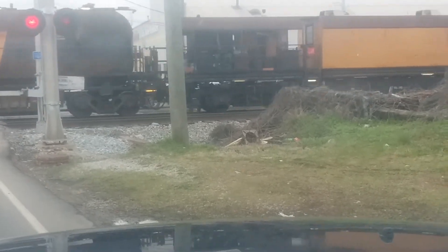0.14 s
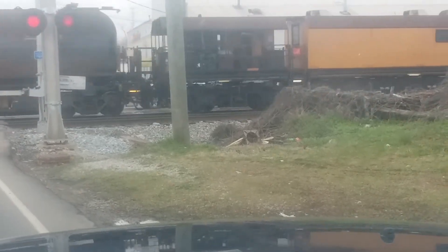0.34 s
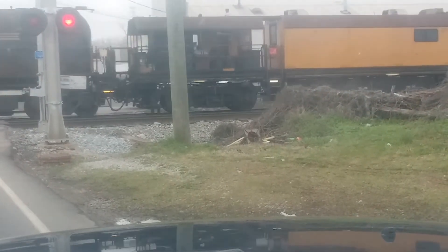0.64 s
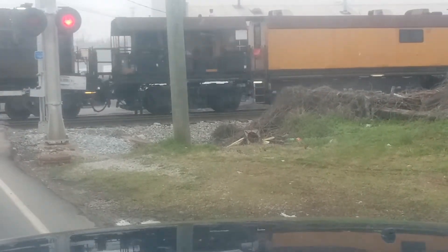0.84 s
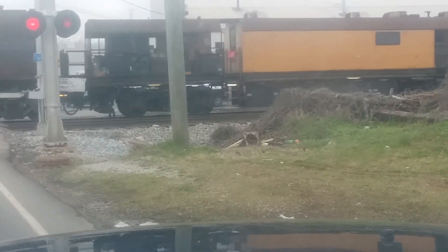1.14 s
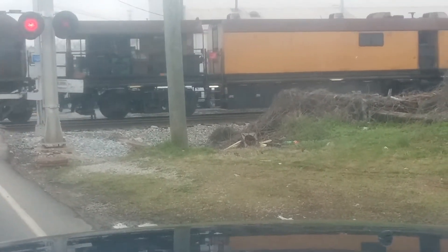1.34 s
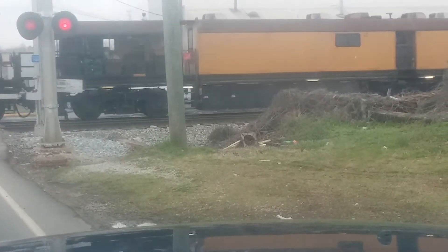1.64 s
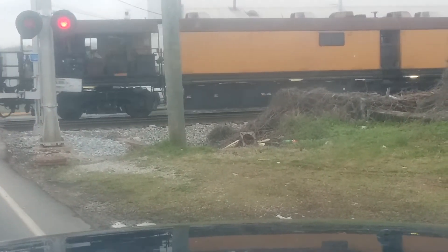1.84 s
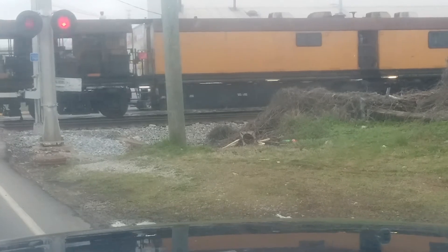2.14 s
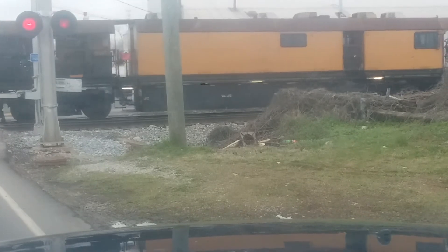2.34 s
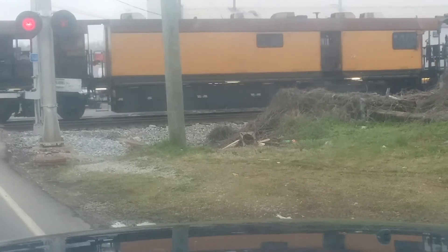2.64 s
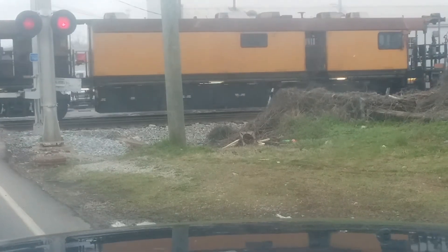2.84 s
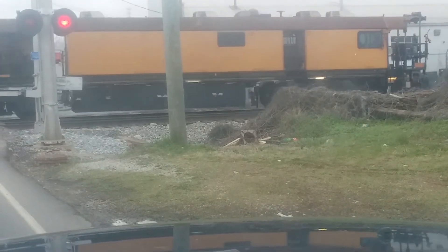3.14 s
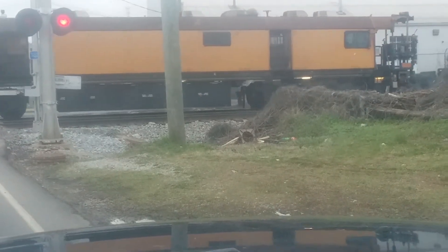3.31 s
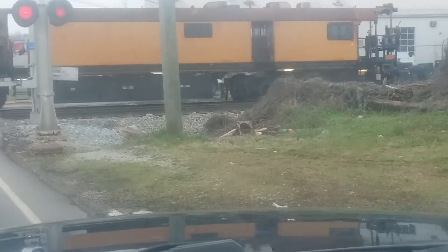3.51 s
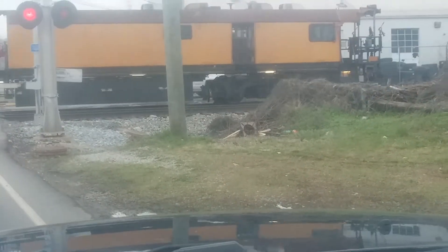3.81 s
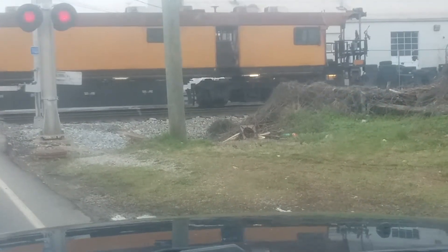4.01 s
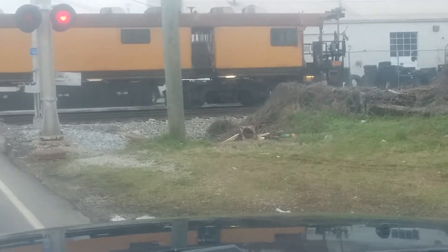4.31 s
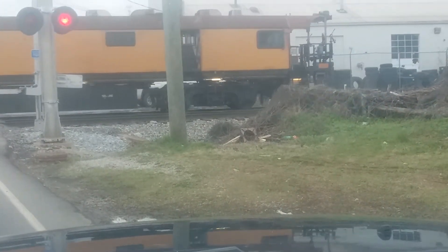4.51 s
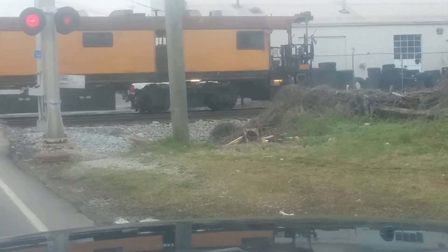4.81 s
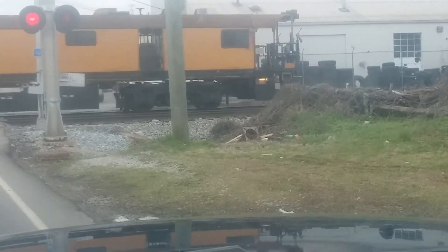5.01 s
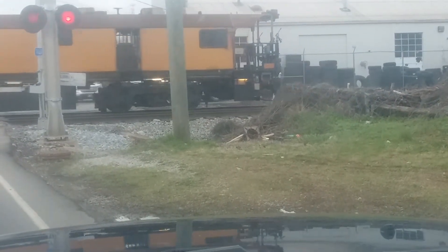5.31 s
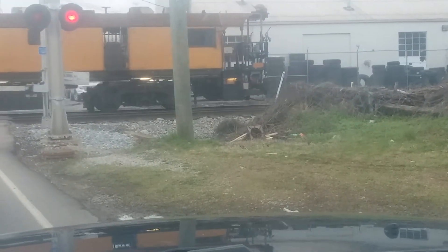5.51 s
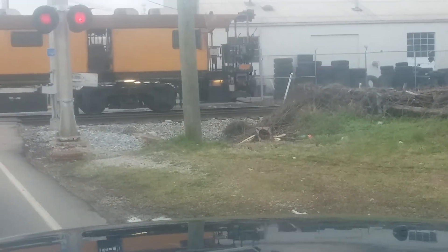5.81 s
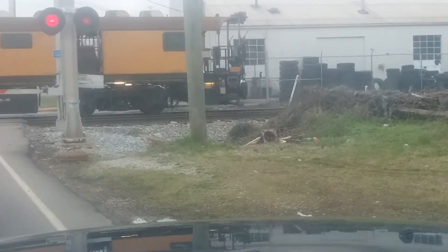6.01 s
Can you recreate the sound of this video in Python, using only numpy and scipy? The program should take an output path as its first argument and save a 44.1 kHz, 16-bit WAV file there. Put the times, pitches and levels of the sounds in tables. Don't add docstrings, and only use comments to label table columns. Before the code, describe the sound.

Heard on a handheld phone inside a closed, idling car at a grade crossing. From 0 s a slow train passes close by: deep, boomy rumble through the body panels, a steady low generator hum and an uneven diesel throb. Heavy axles push the cabin air in soft thumps near 0.2, 1.2, 2.1, 4 and 6.1 s. Faint wheel singing swells around 1.5, 2.7 and 4.1 to 4.5 s. A muffled gong outside strikes evenly, about five times in two seconds. The car engine purrs low and a vent fan hisses smoothly. The train gradually weakens over six seconds. Skin rubs the phone from 3.5 to 4 s with tiny creaks, a low knock comes at 4.6 s, a small squeak at 5.2 s, and crisp creaks cluster from 5.3 to 6 s. A thin, very high electronic whine jumps and glides throughout.

```python
import sys
import numpy as np
from scipy import signal
from scipy.fft import rfft, irfft, next_fast_len
from scipy.io import wavfile
from scipy.ndimage import uniform_filter1d

SR = 44100
rng = np.random.default_rng(int(sys.argv[2]) if len(sys.argv) > 2 else 0)


def put_to_file(sound):
    columns = np.atleast_2d(sound).T
    safe = np.clip(columns, -1, 1)
    whole_steps = np.round(safe * 32767)
    wavfile.write(sys.argv[1], SR, whole_steps.astype(np.int16))


def to_linear_factor(level_db):
    exponent = np.asarray(level_db, float) / 20
    return 10 ** exponent


N = 271207

# f/Hz, level/dB per Hz
RUMBLE_SPECTRUM = [(27, -41), (38, -17.5), (80, -18.5), (150, -11), (210, -18.5), (260, -19.5), (310, -23),
                   (360, -24.5), (480, -25.5), (570, -28), (760, -34), (1200, -40.5), (1600, -54.5),
                   (3000, -81.5)]
# f/Hz, width/Hz, lift/dB
PANEL_MODES = [(192.6, 6.9, 5.5), (233.3, 6.3, 6.5), (284.8, 12, 7.5), (322, 5.9, 3.5), (355, 8.2, 3.5),
               (407, 50, 3.5), (439.4, 7.9, 8.5), (460.4, 5.2, 7.5), (488.4, 4.5, 6), (529, 5.2, 2.5),
               (615, 44, 2.5), (726, 5.5, 8.5), (890, 5.9, 5.5)]
# f/Hz, width/Hz, level/dB
CABIN_AIR_MODES = [(117.8, 9, 7.5), (97.7, 14, -5.5), (148.8, 10, -11.5)]
# t/s, lift/dB, half length/s
AXLE_JOLTS = [(.2, 6.5, 0.77), (.75, 4, 0.24), (1.15, 9, .12), (2.14, 11.5, 0.17), (2.38, 4, .15),
              (2.78, 5, 0.12), (3.15, 4.5, 0.69), (3.92, 10, 0.1), (4.1, 10, .14), (5.12, 4.5, 0.25),
              (6.15, 13.5, .14)]
# t/s, level/dB
HUM_LEVEL = [(0, -30), (.2, -30), (.5, -32), (.7, -29.5), (1.0, -33), (1.4, -28.5), (1.9, -33.5),
             (2.3, -32), (2.7, -32), (3.0, -32), (3.4, -34.5), (3.8, -32.5), (4.2, -34), (4.6, -35.5),
             (5.0, -35), (5.4, -37.5), (5.7, -34), (6.15, -39)]
# multiple of the turning rate, level/dB
DIESEL_ORDERS = [(1, -59.5), (1.4, -61), (1.5, -53), (2, -55.5), (4, -46)]
WHEEL_PITCHES = [
    [388, 420],
    [531],
    [711],
]
# (t/s, lift/dB, half length/s)
WHEEL_SONG = [
    (9, -50.5, .4, [(1.5, 3.5, 1.3), (1.9, 2.5, .2), (2.7, 7.5, 0.38), (4.1, 6, .5), (4.55, 5, 0.27)]),
    (3, -58.5, .4, [(0, 9, 1.4), (2.1, 3, .4), (3.0, 4, .5), (4.7, 3, 0.84)]),
    (6, -63, .1, [(0, 6, 0.33), (1.69, 4, .25), (2.9, 5, .2), (4.1, 4.5, .5), (4.55, 6, .2), (5.3, 4, .8)]),
]
GONG_PITCHES = [581, 1047, 1205, 1554.8, 2099.5, 2685.3]
# level/dB, time to fall 60 dB/s, left-right/dB, left lead/rad
GONG_MODES = [(-63.5, 1.9, 3, 1.5), (-61, 0.84, 1, 1.5), (-63, 1.5, 0.5, 0.8), (-55, 1, -2, 4),
              (-66.5, 1.7, -2.5, 0.7), (-67, 1.7, 6.5, 0)]
# multiple of the turning rate, level/dB
CAR_ENGINE_ORDERS = [(1, -46), (2, -50), (3, -58.5), (4, -46), (6, -47.5), (6.5, -51.5), (7, -59.5)]
# f/Hz, level/dB per Hz
VENT_SPECTRUM = [(500, -30), (900, -1.5), (1500, -2.5), (2000, -3), (2500, -0.5), (2850, -2.5),
                 (3300, -9.5), (4300, -17.5), (5500, -24.5), (7300, -25), (8200, -33), (11000, -33),
                 (16000, -32.5)]
# t/s, lift/dB, half length/s
FAN_BREATHS = [
    (.75, 1.1, 0.34),
    (2.07, 0.4, 0.36),
    (3.2, .9, 0.37),
    (5.3, 0.9, 0.42),
]
# t/s, peak/dB, f/Hz, left-right/dB
CASE_CREAKS = [(3.79, -63, 7000, -2), (3.8, -62, 4600, 5), (3.958, -60, 6750, 0), (3.96, -56, 12300, -6),
               (3.985, -59, 6940, 0), (3.994, -64, 6800, 4), (4.463, -60, 5600, 8), (4.624, -61, 5800, 2.5),
               (4.669, -66, 6500, 4), (4.695, -63, 5000, 4), (4.85, -63, 5500, 6), (4.96, -62, 5470, 4),
               (5.0, -66, 6800, 4), (5.345, -56, 5600, -1.5), (5.469, -58, 5500, 3), (5.476, -61, 5800, 5),
               (5.47, -72, 8500, -2.5), (5.54, -63, 6200, 3), (5.601, -59, 4300, 9), (5.735, -69, 8300, -9),
               (5.817, -53, 7500, 0), (5.819, -56, 5000, 6), (5.895, -51, 4660, 8),
               (5.896, -62, 6500, -2.5), (5.911, -55, 4700, 1.5), (5.949, -60, 4500, 4),
               (5.992, -64, 9500, -5), (6.008, -62, 4700, 7), (6.038, -71, 8500, -7)]
# t/s, peak/dB, f/Hz, left-right/dB, width/Hz
CASE_SQUEAKS = [
    (4.597, -39, 728, 0, 50),
    (5.212, -58, 4500, -3, 180),
    (5.215, -61.5, 6070, 5, 90),
]
# f/Hz, level/dB per Hz
RUB_SPECTRUM = [(2500, -33.5), (4500, -3.5), (6500, 4.5), (8500, 1), (9800, -8), (11500, 1), (13000, -0.5),
                (16000, -10)]
# t/s, lift/dB, half length/s
SKIN_SLIDES = [(3.5, 7, .08), (3.64, 13, .12), (3.79, 15, .09), (3.88, 11, .08), (3.96, 18.5, 0.098),
               (4.9, 9, 1.1), (5.5, 8, .25), (5.75, 12, .07), (5.83, 15, 0.1), (5.92, 14, 0.1),
               (6.03, 17, 0.11)]
# t/s, f/Hz, glide/Hz per s
CIRCUIT_LOADS = [(0, 13920, -250), (.95, 13720, -1200), (1.23, 14600, 1600), (1.47, 14940, -2500),
                 (1.74, 14920, -700), (1.98, 14550, -900), (2.38, 14570, -1500), (2.58, 14650, -2500),
                 (2.78, 14100, -5000), (2.94, 14960, 30), (3.62, 14700, -3500), (3.76, 14750, 2200),
                 (4.12, 14400, -9000), (4.18, 13970, 30), (4.45, 14800, -300), (4.72, 14950, -3500),
                 (5.0, 15050, -4000), (5.36, 15100, -6000), (5.5, 14040, 499.5), (5.79, 13300, -1800),
                 (6.03, 13550, 31.5)]
# t/s, dip/dB, half length/s
WHINE_STALLS = [(2.395, -7, .03), (3.59, -10, .05), (4.02, -8, .05), (4.075, -11, .07), (4.28, -9, .04),
                (4.36, -8, .06), (4.68, -9, .04), (6.02, -7, .06)]
# start t/s, end t/s, level/dB
CLOCK_LOCKS = [
    (0, 1.06, -68),
    (1.18, 1.215, -69),
    (4.195, 4.245, -69),
    (4.3, 4.44, -69),
    (5.495, 5.52, -70),
    (5.55, 5.65, -66.5),
]
# f/Hz, level/dB per Hz
HASH_SPECTRUM = [(11000, -30), (11450, -21.5), (11700, -7.5), (12500, -4), (13300, -1), (14500, 2),
                 (16000, -5)]
# f/Hz, likeness from 0 to 1
EAR_LIKENESS = [(60, 1), (99, 1.0), (160, 0.97), (270, 0.9), (450, 0.99), (740, 0.72), (1220, 0.16),
                (2010, 0.41), (3330, 0.56), (5500, 0.41), (9080, 0.34), (15000, 0.72)]
# f/Hz, left-right/dB
EAR_LEAN = [(60, -1), (99, 1), (160, -1), (270, 1.5), (450, -0.5), (740, 0.0), (1220, 2), (2010, 4.5),
            (3330, 7), (5500, 8), (9080, 2.5), (15000, 8)]


def clock():
    return np.arange(N) / SR


def swells(rows):
    return sum(db * np.maximum(1 - np.abs(clock() - s) / half_s, 0) for s, db, half_s in rows)


def rms_one(x):
    return x / np.sqrt(np.mean(x ** 2) + 1e-20)


def at_hz(points, hz):
    f, value = np.transpose(points)
    return np.interp(np.log(hz), np.log(np.maximum(f, 1)), value)


def drift(rate):
    r = np.exp(-80 * np.pi * rate / SR)
    slow = signal.lfilter([1], [1, -2 * r, r * r], rng.standard_normal(N // 40 + 2002))
    slow = rms_one(slow[2000:])
    return np.interp(np.arange(N) / 40, np.arange(len(slow)), slow)


def resonance(x, hz, width_hz):
    r = np.exp(-np.pi * width_hz / SR)
    top = np.array([1, 0, -1]) * (1 - r * r) / 2
    return signal.lfilter(top, [1, -2 * r * np.cos(2 * np.pi * hz / SR), r * r], x)


def sides(pan_db):
    return to_linear_factor(np.array([[.5], [-.5]]) * pan_db)


def cabin_noise(spectrum, modes=()):
    size = next_fast_len(N)
    hz = np.maximum(np.arange(size // 2 + 1) * SR / size, 1)
    mid, side = rfft(rng.standard_normal((2, size)))
    alike = np.clip(at_hz(EAR_LIKENESS, hz), 0, 1)
    pair = np.sqrt(1 + alike) * mid + np.sqrt(1 - alike) * side * [[1], [-1]]
    pair = pair * sides(at_hz(EAR_LEAN, hz))
    lift_db = sum(db / (1 + (2 * (hz - centre) / width) ** 2) for centre, width, db in modes)
    out = irfft(pair * to_linear_factor(at_hz(spectrum, hz) + lift_db), size)[:, :N]
    return out / np.sqrt(np.mean(out.mean(0) ** 2))


def orders(hz, table, waver_db):
    turn = 2 * np.pi * np.cumsum(hz) / SR
    out = np.zeros(N)
    for multiple, db in table:
        height = np.sqrt(2) * to_linear_factor(db + waver_db * drift(1.9))
        out += height * np.sin(multiple * turn + rng.uniform(0, 2 * np.pi))
    return out


def body_rumble():
    return to_linear_factor(-35.5 - 0.38 * clock() + 1.13) * cabin_noise(RUMBLE_SPECTRUM, PANEL_MODES)


def cabin_boom():
    white = rng.standard_normal(N + SR)
    boom = 0
    for hz, width_hz, db in CABIN_AIR_MODES:
        once = resonance(white, hz, 1.36 * width_hz)
        boom = boom + to_linear_factor(db) * resonance(once, hz, 1.36 * width_hz)
    level_db = -35 - 1.0 * clock() + swells(AXLE_JOLTS)
    return to_linear_factor(level_db) * rms_one(boom[SR:])


def generator_hum():
    t, level_db = np.transpose(HUM_LEVEL)
    level_db = np.interp(clock(), t, level_db) + 0.3
    return to_linear_factor(level_db) * orders(np.full(N, 133.9), [(1, 0.0011), (2, -22)], waver_db=1.5)


def diesel():
    return orders(44.24 * (1 + 0.001977 * drift(1.5)), DIESEL_ORDERS, waver_db=3.5)


def train():
    low = cabin_boom() + generator_hum() + diesel()
    return low * sides(.4) + body_rumble()


def wheels():
    out = 0
    for pitches, (width_hz, db, fade_db, passes) in zip(WHEEL_PITCHES, WHEEL_SONG):
        shared = rng.standard_normal(N + SR)
        rough = shared + 0.48 * rng.standard_normal((2, N + SR))
        ring = sum(resonance(resonance(rough, hz, width_hz), hz, width_hz) for hz in pitches)[:, SR:]
        out = out + to_linear_factor(db - fade_db * clock() + swells(passes)) * rms_one(ring)
    return out


def gong():
    first_s, period_s = 0.04, .384
    since = (clock() - first_s) % period_s
    blow = ((clock() - first_s) // period_s).astype(int) + 1
    out = np.zeros((2, N))
    for hz, (db, t60, pan_db, lead) in zip(GONG_PITCHES, GONG_MODES):
        uneven_db = 1.5 * rng.standard_normal(30)[blow]
        height = to_linear_factor(db - 60 * since / t60 + uneven_db)
        height = uniform_filter1d(height, int(0.055 * SR), origin=int(0.022 * SR))
        out += height * sides(pan_db) * np.sin(2 * np.pi * hz * clock() + np.array([[lead], [0]]))
    return out


def car_engine():
    hunt_hz = .19 * np.cos(2 * np.pi * clock() / 1.4)
    return orders(24.12 + hunt_hz, CAR_ENGINE_ORDERS, waver_db=1.4)


def vent():
    level_db = -60 - 0.19 * clock() + swells(FAN_BREATHS) + 4.0 + 0.59 * drift(4.5)
    return to_linear_factor(level_db) * cabin_noise(VENT_SPECTRUM)


def case_creaks():
    t = np.arange(8820) / SR
    out = np.zeros((2, N + len(t)))
    rings = [(*row, min(.3 * row[2], 2200), .045) for row in CASE_CREAKS]
    rings += [(*row, 0.044) for row in CASE_SQUEAKS]
    for s, db, hz, pan_db, width_hz, t60 in rings:
        burst = rng.standard_normal((3, len(t)))
        burst = burst[0] + 0.7 * burst[1:]
        burst = burst * to_linear_factor(-60 * t / t60) * np.minimum(t / .0015, 1)
        tick = resonance(resonance(burst, hz, width_hz), hz, width_hz)
        at = round(s * SR)
        out[:, at:at + len(t)] += to_linear_factor(db) * sides(pan_db) * tick / np.abs(tick.mean(0)).max()
    return out[:, :N]


def skin_rub():
    level_db = -91.5 + swells(SKIN_SLIDES) + 1.8 * drift(60)
    return to_linear_factor(level_db) * cabin_noise(RUB_SPECTRUM) * to_linear_factor(np.array([[-3.5], [5]]))


def whine_pitch():
    load = np.searchsorted([s for s, *_ in CIRCUIT_LOADS[1:]], clock())
    start, centre, glide = np.array(CIRCUIT_LOADS)[load].T
    return uniform_filter1d(centre + glide * (clock() - start), int(.03 * SR))


def clock_tone():
    locked = sum(to_linear_factor(db) * (clock() >= on) * (clock() < off) for on, off, db in CLOCK_LOCKS)
    tone = orders(np.full(N, 2000), [(7, -4.0), (6, -20.5)], waver_db=0.5)
    return uniform_filter1d(locked, size=300) * tone * sides(5)


def whine():
    hz = whine_pitch()
    level_db = -65.5 - 1.2 * (hz / 1000 - 14) + swells(WHINE_STALLS)
    frame = 59.8 * clock() % 1
    turn = 2 * np.pi * np.cumsum(hz + 550 * (frame - .5) + 330 * drift(300)) / SR
    low_pass = signal.butter(2, 260, fs=SR, output="sos")
    slow = signal.sosfilt(low_pass, rng.standard_normal((2, 2, N)))
    own, other = slow[:, 0] * np.cos(turn) + slow[:, 1] * np.sin(turn)
    own = rms_one(own) + 1.8 * np.cos(turn)
    other = rms_one(other)
    pulse = 1 + .12 * np.sin(2 * np.pi * frame) + .08 * np.sin(4 * np.pi * frame)
    pair = np.array([rms_one(own), to_linear_factor(-14.5) * rms_one(own + .5 * other)])
    band = to_linear_factor(level_db + 2.5) * pulse * pair
    hash_db = -69 + .3 * (level_db + 69.5)
    return band + to_linear_factor(hash_db) * cabin_noise(HASH_SPECTRUM) * sides(4) + clock_tone()


def scene():
    outside = train() + wheels() + gong()
    car = car_engine() + vent()
    phone = case_creaks() + skin_rub() + whine()
    return outside + car + phone


def top_cut(x):
    return signal.sosfilt(signal.butter(12, 16160, fs=SR, output="sos"), x)


def record(dry):
    steep = signal.ellip(14, .3, 55, 15730, fs=SR, output="sos")
    return top_cut(signal.sosfilt(steep, dry))


dry = scene()
out = record(dry)
put_to_file(out)
```